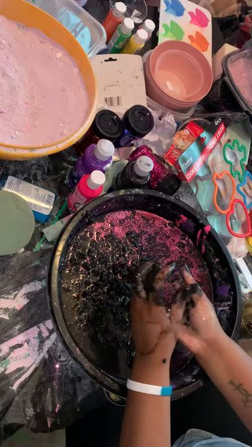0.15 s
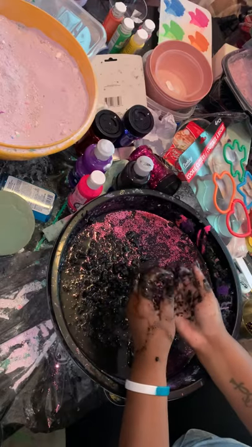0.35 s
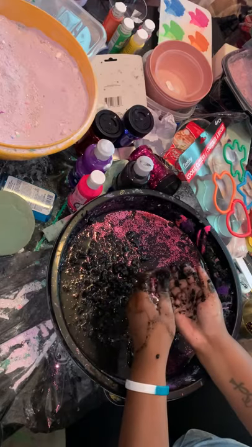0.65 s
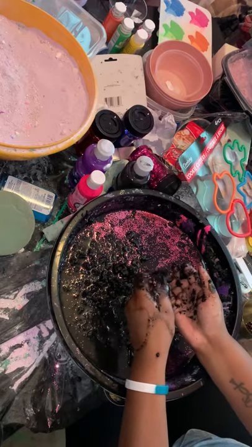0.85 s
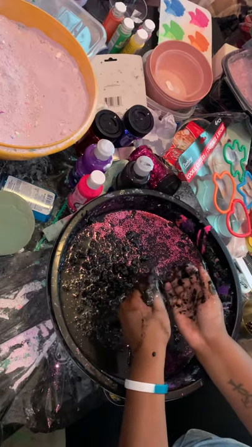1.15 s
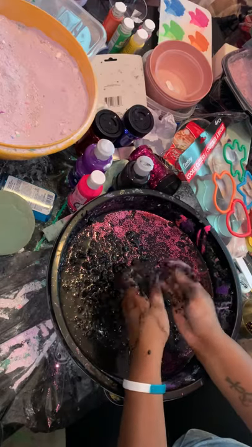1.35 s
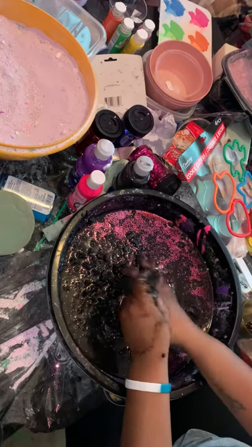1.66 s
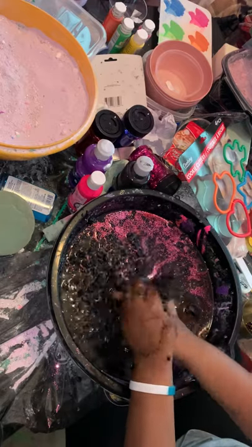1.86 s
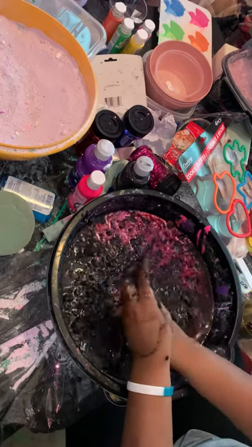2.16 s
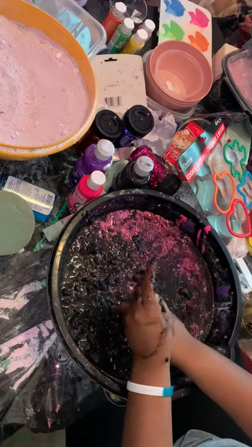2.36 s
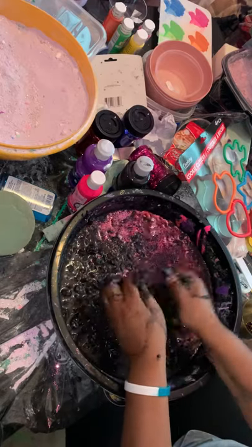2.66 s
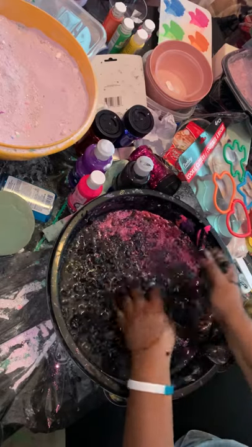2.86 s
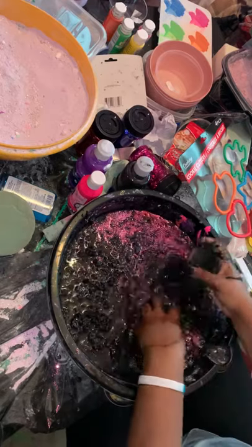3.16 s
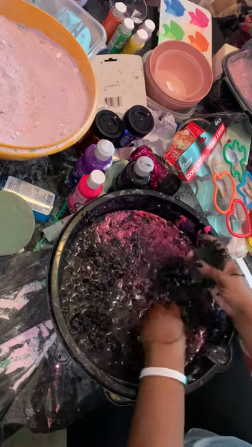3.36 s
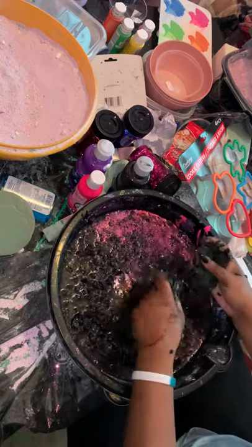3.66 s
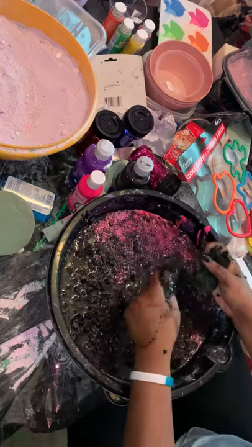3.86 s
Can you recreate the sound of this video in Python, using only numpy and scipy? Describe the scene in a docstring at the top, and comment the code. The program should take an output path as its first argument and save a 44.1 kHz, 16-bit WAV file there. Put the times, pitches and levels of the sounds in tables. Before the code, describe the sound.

Wet foam crumbs crunch, fizz and squish between kneading hands, then lumps plop into a tub

```python
"""Two hands squeeze and stir soaked floral foam in a plastic tub, close to a pair of microphones.
A low room rumble lies underneath and swells once, a little over a second in. From the start, crushed
cells fizz and crunch as showers of clicks and tiny rings; crumbs snap and wet foam pats in noise bursts.
Handfuls squelch in lumpy gurgles, bubbles burst as short rings and air pockets glide in pitch.
A small lump lands midway; near three seconds wet lumps slap down as falling plops, with a low thud."""
import sys
import numpy as np
from scipy import signal
from scipy.fft import rfft, irfft
from scipy.io import wavfile
from scipy.ndimage import uniform_filter1d

SR = 44100
rng = np.random.default_rng(int(sys.argv[2]) if len(sys.argv) > 2 else 0)


def dump(signal):
    """Clip the signal to [-1, 1] and save it as 16-bit WAV at the path in sys.argv[1]."""
    limited = np.clip(np.atleast_2d(signal).T, -1, 1)
    pcm = np.round(limited * 32767).astype(np.int16)
    wavfile.write(sys.argv[1], SR, pcm)


N = 176400
TIME, HZ = np.arange(N) / SR, np.fft.rfftfreq(2 * N, 1 / SR)


def amp(db):
    """Decibels to gain."""
    return 10 ** (np.asarray(db) / 20)


def unit(x):
    """Scales to rms 1."""
    return x / np.sqrt(np.mean(x ** 2) + 1e-20)


def read(points):
    """Reads a table over frequency, joined by straight lines on a log axis."""
    f, value = np.transpose(points)
    return np.interp(np.log(HZ + 1), np.log(f), value)


def colour(x, gain):
    """Filters by a gain for each frequency."""
    return irfft(rfft(x, 2 * N) * gain)[..., :N]


def add(mix, s, sound):
    """Mixes a sound in at a time in seconds."""
    part = mix[max(round(s * SR), 0):][:len(sound)]
    part += sound[:len(part)]


def clicks(per_s, spread_db):
    """Random clicks of either sign, mostly small and a few large."""
    size = amp(spread_db * np.minimum(rng.exponential(1, N), 4))
    sign = rng.choice([-1, 1], N)
    return size * sign * (rng.random(N) < per_s / SR)


def clumps(depth_db, size):
    """A gain that wanders at random, smoothed twice over a window of so many samples."""
    smooth = uniform_filter1d(uniform_filter1d(rng.standard_normal(N), size), size)
    return amp(depth_db * unit(smooth))


def thin(x):
    """Small bubbles radiate little bass: a steep cut below a corner."""
    cut_hz = 1010
    return colour(x, 1 / np.sqrt(1 + (cut_hz / (HZ + 1)) ** 10))


def rumble():
    """Low, wandering room noise, nearly the same at both microphones; it swells once."""
    # room rumble spectrum: (frequency [Hz], gain [dB])
    rumble_spectrum = [(20,-38),(35,-24.5),(54,4),(75,-1.5),(115,-6),(170,-18.5),(260,-28),(450,-40),(1500,-59.5),(15000,-93)]
    level_db, width_db = -60, -13  # width: noise that differs between the microphones
    swell_at_s, swell_length_s, swell_db = 1.14, 0.2, 5
    noise = rng.standard_normal(N) + amp(width_db) * rng.standard_normal((2, N))
    swell = amp(swell_db * np.exp(-((TIME - swell_at_s) / swell_length_s) ** 2))
    wandering = colour(noise, amp(read(rumble_spectrum))) * clumps(0.64, size=4000)
    return amp(level_db) * swell * unit(wandering)


def thud():
    """The weight of the lump bumps the tub's bottom and the table: low, fading tones."""
    # tones of the bump: (pitch [Hz], level [dB], fade time constant [s])
    thud_tones = [(106.7,-36,0.022),(76,-45.5,0.071)]
    start_s, rise_s = 3.084, 0.01
    t = np.maximum(TIME - start_s, 0)
    late = np.maximum(t - rise_s, 0)
    tones = sum(amp(db) * np.exp(-late / fade) * np.sin(2 * np.pi * hz * t)
                for hz, db, fade in thud_tones)
    return np.minimum(t / rise_s, 1) * tones


def pockets():
    """Clicks ring in an air pocket that swells and drains; its resonance glides in pitch."""
    # air pockets: (start [s], length [s], level before trim [dB], first pitch [Hz], last pitch [Hz])
    pocket_events = [(1.151,0.12,-64,2560,1700),(1.481,0.12,-60,2280,1550),(2.382,0.074,-70,1660,1500),(2.797,0.022,-54.5,2400,1530),(2.781,0.44,-60,780,870),(2.862,0.046,-53.5,1350,960),
                     (3.807,0.018,-50.5,4250,3300),(2.92,0.081,-53.5,780,930)]
    width_hz, trim_db = 320, -2.5
    out = np.zeros(N)
    r = np.exp(-np.pi * width_hz / SR)
    for s, length, db, first_hz, last_hz in pocket_events:
        u = np.arange(0, length, 1 / SR) / length
        pitch = first_hz + (last_hz - first_hz) * u
        turn = np.exp(2j * np.pi * np.cumsum(pitch) / SR)
        # shift the gliding pitch to zero, resonate there, shift back
        still = clicks(900, 0.51)[:len(u)] / turn
        ring = (turn * signal.lfilter([1], [1, -2 * r, r * r], still)).real
        add(out, s, amp(db + trim_db) * np.sqrt(np.sin(np.pi * u)) * unit(ring))
    return out


def squelches():
    """Water and air are forced out of a handful in low, lumpy gurgles of clicks."""
    # handfuls squeezed against the tub: (start [s], rise [s], hold [s], release time constant [s],
    # level [dB], brightness [dB per octave])
    squelch_events = [(0.42,0.072,0.13,0.035,-60.5,-12.5),(0.8,0.0058,0.047,0.022,-53,-11.5),(0.871,0.0032,0.016,0.046,-51.5,-10),(0.981,0.034,0.042,0.021,-62,-7),
                      (1.841,0.043,0.022,0.028,-54.5,-7),(2.105,0.11,0.41,0.25,-66.5,9.5),(2.954,0.057,0.0055,0.0099,-46,-18),(3.049,0.012,0.04,0.022,-45,-7.5)]
    # gurgle spectrum: (frequency [Hz], gain [dB])
    squelch_spectrum = [(25,-40),(70,4.5),(160,-6.5),(280,-4.5),(410,5),(510,3.5),(740,2.5),(1000,0),(1400,-6),(1800,-20),(2600,-53),(6000,-57)]
    tilt_from_hz = 263  # each squelch brightens or dulls above this
    out = np.zeros(N)
    octaves_up = np.log2(np.maximum(HZ / tilt_from_hz, 1))
    for s, rise, hold, release, db, tilt_db in squelch_events:
        gurgle = colour(clicks(1300, 3.65), amp(read(squelch_spectrum) + tilt_db * octaves_up))
        fade = np.exp(-np.maximum(TIME - s - rise - hold, 0) / release)
        shape = np.clip((TIME - s) / rise, 0, 1) * fade
        out += amp(db) * shape * unit(gurgle)
    return out * clumps(2.8, size=350)


def slaps():
    """A wet lump lands: a fast falling plop with a noise splash around it."""
    # landing lumps: (time [s], envelope peak [dB], starting pitch [Hz], time to the peak [s])
    slap_events = [(1.9115,-38.5,1300,0.0038),(2.9755,-27,1750,0.0027),(3.0040,-27.5,1050,0.0034),(3.0675,-29.5,1574,0.0028),(3.0985,-40,800,0.003)]
    # splash spectrum: (frequency [Hz], gain [dB])
    splash_spectrum = [(100,-37.5),(400,1.5),(750,-9.5),(1000,-33),(1350,-2.5),(1750,-13),(2100,-16.5),(2700,-27),(5000,-28),(9000,-45)]
    end_hz, glide_lengths, splash_db = 344, 1.443, -5.5  # splash relative to the envelope
    out, t = np.zeros(N), TIME[:3000]
    splash = amp(splash_db) * unit(colour(rng.standard_normal(N), amp(read(splash_spectrum))))
    for k, (s, db, hz, length) in enumerate(slap_events):
        pitch = end_hz + (hz - end_hz) * np.exp(-t / (glide_lengths * length))
        plop = np.sin(2 * np.pi * np.cumsum(pitch) / SR)
        shape = t / length * np.exp(1 - t / length)
        add(out, s, amp(db) * shape * (plop + splash[k * len(t):][:len(t)]))
    return out


def tub(x):
    """The plastic tub rings in its modes with whatever presses on it."""
    # modes of the tub: (pitch [Hz], level [dB], time to fall 60 dB [s])
    tub_modes = [(267,-2,0.16),(408.3,10,0.13),(684,7,0.16),(746.5,13.5,.18),(895,4,.15),(1204,12,.15)]
    level_db = -12  # relative to what presses on it
    t = TIME[:SR // 2]
    ring = sum(amp(db) * 1000 ** (-t / t60) * np.cos(2 * np.pi * hz * t) for hz, db, t60 in tub_modes)
    return amp(level_db) * np.std(x) * unit(signal.fftconvolve(x, ring)[:N])


def pats():
    """Wet foam meets or leaves the skin with a short, broad smack of noise."""
    # pats against the hands: (time [s], level before the envelope [dB], centre [Hz])
    pat_events = [(0.3142,-50,1410),(0.3878,-49,1500),(.4262,-49.5,1180),(.5035,-48.5,890),(0.578,-45.5,890),(.8055,-44.5,1130),(0.825,-42,1580),(.8800,-44.5,1010),(.9415,-48,1400),
                  (1.0386,-44.5,590),(1.0830,-55,1500),(1.1565,-48.5,1800),(1.2186,-48,1360),(1.775,-49.5,1390),(1.9105,-51.5,1010),(2.1590,-56.5,1700),(2.3365,-54,1900),(3.0057,-40,1680),(3.1645,-45.5,1006),(3.947,-56,1600)]
    rise_s, fade_s, width_octaves = 0.00052, 0.0044, 1.05
    out, t = np.zeros(N), TIME[:1024]
    hz = np.fft.rfftfreq(len(t), 1 / SR) + 1
    shape = np.minimum(t / rise_s, 1) * np.exp(-np.maximum(t - rise_s, 0) / fade_s)
    for s, db, centre_hz in pat_events:
        band = np.exp(-(np.log2(hz / centre_hz) / width_octaves) ** 2)
        smack = unit(irfft(rfft(rng.standard_normal(len(t))) * band))
        add(out, s, amp(db) * shape * smack)
    return out


def pops():
    """A larger bursting bubble rings briefly at its own pitch."""
    # bursting bubbles: (time [s], envelope peak before the bass cut [dB], pitch [Hz])
    pop_events = [(0.941,-39,1550),(0.9745,-41,1620),(0.9755,-51,2370),(1.1777,-51,2660),(1.2200,-43,2200),(1.2470,-50,860),(1.336,-53,1290),(1.348,-52,1900),
                  (1.5745,-44,1930),(1.7754,-54.5,1249),(2.437,-38.5,1440),(2.796,-39,2240),(2.8760,-38,1780),(3.1840,-38,910),(3.198,-48,1170),
                  (3.7489,-42,2400),(3.8041,-38.5,1370),(3.9041,-41,1630),(3.9044,-36,3340),(3.9166,-37,3350),(3.9840,-44,1550)]
    fade_cycles, rise_s = 2.2, 0.00067
    out, t = np.zeros(N), TIME[:1200]
    for s, db, hz in pop_events:
        shape = (1 - np.exp(-t / rise_s)) * np.exp(-t * hz / fade_cycles)
        add(out, s, amp(db) * shape / shape.max() * np.sin(2 * np.pi * hz * t))
    return thin(out)


def snaps():
    """A crumb breaks in a noise burst of a few milliseconds, with a faint lower body."""
    # snapping crumbs: (time [s], level before the envelope [dB], centre [Hz], spread [octaves])
    snap_events = [(0.1693,-45,11600,0.53),(0.316,-39.5,8850,1.6),(0.319,-54,8000,1.1),(.3882,-42,7700,1.1),(0.3915,-44.5,8400,0.96),(.5790,-48,5270,0.79),
                   (0.7668,-50,6550,1.9),(0.8353,-41,7600,0.13),(.8570,-47.5,6400,0.12),(1.0054,-40.5,11500,0.99),(1.1253,-44,7100,0.49),(1.1637,-44.5,12000,0.39),
                   (1.6665,-43,6640,0.33),(1.7380,-48,6600,0.15),(1.7540,-46.5,12900,0.54),(1.7719,-38,6650,0.15),(2.158,-44,7400,1.6),
                   (2.3377,-33.5,11700,0.8),(2.4380,-46.5,5850,0.27),(2.4595,-48.5,9000,1.2),(2.474,-45,8850,1.2),(2.632,-43,7300,0.31),(2.638,-46,8500,0.18),(2.6490,-44,8300,0.19),
                   (2.695,-45.5,4060,0.65),(2.762,-54,6500,0.11),(2.7835,-48,6160,0.078),(2.7978,-40.5,4630,1),(2.871,-45,7100,0.17),(2.8747,-38.5,6800,0.79),(3.0830,-49.5,6460,0.15),
                   (3.8026,-41.5,12000,0.68),(3.8050,-44,4660,0.54),(3.9040,-39,4970,0.64),(3.9325,-45.5,5800,0.34),(3.95,-47,7000,0.76),(3.9584,-39.5,8250,0.77),(3.9728,-41,5600,0.072)]
    hold_s, fade_s, body_hz, body_db = 0.0017, 0.0009, 2400, -20
    out, t = np.zeros(N), TIME[:512]
    hz = np.fft.rfftfreq(len(t), 1 / SR) + 1
    shape = np.exp(-np.maximum(t - hold_s, 0) / fade_s)
    body = amp(body_db) * np.exp(-np.log2(hz / body_hz) ** 2)
    for s, db, centre_hz, octaves in snap_events:
        band = 1 / (1 + (np.log2(hz / centre_hz) / octaves) ** 2) + body
        burst = unit(irfft(rfft(rng.standard_normal(len(t))) * band))
        add(out, s, amp(db) * shape * burst)
    return out


def fits():
    """The foam gives way in fits: each starts at once and dies quickly."""
    per_s, depth, fade_s = 60, 0.95, 0.0045
    gives = (rng.random(N) < per_s / SR) * rng.uniform(0.47, 1.3, N)
    bursts = signal.oaconvolve(gives, np.exp(-TIME[:4000] / fade_s))[:N]
    return unit(1 + depth * bursts)


def grains(per_s, spread_db, centre_hz, octaves, cycles):
    """Many tiny cavities, each ringing for a few cycles at one of forty pitches."""
    train, t = clicks(per_s, spread_db), TIME[:900]
    kind, out = rng.integers(0, 40, N), np.zeros(N)
    # evenly ranked picks from a bell curve of pitches
    for k, octave in enumerate(np.sort(rng.standard_normal(4000))[50::100]):
        hz = centre_hz * 2 ** (octave * octaves)
        ring = np.sin(2 * np.pi * hz * t) * np.exp(-t * hz / cycles) * (1 - np.exp(-t * hz))
        out += signal.oaconvolve(train * (kind == k), ring)[:N]
    return out


def kneading():
    """Bubbles and collapsing cells ring briefly over a fizz of fine clicks."""
    # the kneading, before trims: (time [s], bubbling level [dB], crunch level [dB], fizz level [dB])
    knead_levels = [(0, -66, -71, -62.5), (0.118, -86.5, -91, -69.5), (0.298, -57.5, -58.5, -53.5),
                    (0.37, -72, -69, -58.5), (0.471, -57, -64, -56), (0.6, -58, -57, -63),
                    (0.73, -68, -65.5, -68), (0.78, -60.5, -61, -57.5), (0.83, -54, -47, -52.5),
                    (0.95, -48.5, -54.5, -58.5), (1.07, -53.5, -50, -59), (1.14, -60, -63, -62),
                    (1.2, -74, -66.5, -63.5), (1.42, -76, -75.5, -63.5), (1.531, -70, -59.5, -58),
                    (1.72, -61, -74.5, -62.5), (1.8, -58, -59, -59), (2.05, -67, -78.5, -67.5),
                    (2.25, -64, -60, -54.5), (2.32, -62, -70, -64.5), (2.42, -56, -64.5, -65.5),
                    (2.581, -54, -60, -63), (2.65, -61, -63, -53), (2.75, -80, -63.5, -62),
                    (2.87, -70, -61.5, -57), (3.05, -57.5, -66.5, -61), (3.3, -71.5, -89.5, -70),
                    (3.5, -72, -77, -71), (3.66, -67.5, -73, -73), (3.79, -64, -66, -64),
                    (3.815, -69, -57, -58), (3.89, -61, -64, -59.5), (3.93, -68, -55.5, -59),
                    (4, -62, -64, -55.5)]
    # colour of the crushed cells: (frequency [Hz], gain [dB])
    crunch_spectrum = [(900,4),(1900,-5),(2700,-5),(3600,-1),(4400,-0.5),(5300,-4),(7500,-1),(10000,-14)]
    # colour of the fine clicks: (frequency [Hz], gain [dB])
    fizz_spectrum = [(3000,-13),(5000,-4.5),(5900,-2.5),(6800,-1),(8300,-3.5),(9800,-7),(12600,-1),(14000,-4.5),(16000,-22)]
    bubble_db, crunch_db, fizz_db = -7, -0.5, -0.26  # trims
    s, *levels = np.transpose(knead_levels)
    wet, crunch, fizz = (amp(np.interp(TIME, s, level)) for level in levels)
    bubbles = grains(per_s=1700, spread_db=2.96, centre_hz=1550, octaves=0.582, cycles=2.3)
    cells = grains(per_s=2200, spread_db=3.9, centre_hz=4112, octaves=0.585, cycles=4.7)
    bubbling = wet * amp(bubble_db) * unit(thin(bubbles))
    crunching = crunch * amp(crunch_db) * unit(colour(cells, amp(read(crunch_spectrum))))
    fizzing = fizz * amp(fizz_db) * unit(colour(clicks(6000, 1.53), amp(read(fizz_spectrum))))
    return fits() * (bubbling + crunching + fizzing)


def echoes(x, t60, spectrum, shift_s):
    """A dying cloud of reflections, different at each microphone and from moment to moment."""
    out, hop, t = np.zeros((2, N)), round(shift_s * SR), TIME[:round(2 * shift_s * SR)]
    for start in range(-hop, N, hop):
        # overlapping pieces, each with fresh reflections
        at = np.arange(max(start, 0), min(start + 2 * hop, N))
        piece = x[at] * np.sin(np.pi * (at - start) / (2 * hop))
        for channel in out:
            tail = rng.standard_normal(len(t)) * np.exp(-np.log(1000) * t / t60)
            add(channel, at[0] / SR, signal.fftconvolve(piece, tail / np.linalg.norm(tail)))
    return colour(out, amp(read(spectrum)))


def scene():
    """The foam reaches the two microphones directly, off tub and hands, and off the room."""
    # phase between the microphones: (frequency [Hz], lead of the left [radians])
    pair_phase = [(200,0),(900,-.3),(1500,0),(2300,.4),(3500,.7),(4300,1.8),(4900,3.14),(5700,4.9),(6400,6.15),(7600,6.35),(8500,7.9),(9700,9.42),(10700,10.9),(11700,12.3),(12800,12.7),(13600,14.6),(14600,15.7)]
    # level between the microphones: (frequency [Hz], left minus right [dB])
    pair_balance = [(60,-1.9),(400,-2.6),(1200,-0.3),(2500,-2.5),(4500,0.4),(14000,-0.6)]
    # reflections off tub and hands: (frequency [Hz], level relative to the direct sound [dB])
    scatter_spectrum = [(100,-20),(700,-10),(1500,-9),(3000,0),(4500,-4),(6800,-14),(8500,-8),(12500,-12)]
    # reflections off the room: (frequency [Hz], level relative to the direct sound [dB])
    room_spectrum = [(100,-9),(700,-2.5),(3000,0),(7000,-8),(14000,-58)]
    hollow_hz, hollow_width_hz, hollow_db = 505, 42, -7  # a narrow dip in the sound of the tub
    heavy = slaps() + squelches()
    foam = kneading() + snaps() + pops() + pats() + pockets() + heavy + tub(heavy) + thud()
    foam = colour(foam, amp(hollow_db * np.exp(-((HZ - hollow_hz) / hollow_width_hz) ** 2)))
    side = np.array([[.5], [-.5]])  # half of each difference to left and right
    heard = colour(foam, np.exp(1j * side * read(pair_phase)))
    # the moving hands keep changing the reflections
    heard += echoes(foam, t60=.02, spectrum=scatter_spectrum, shift_s=.04)
    heard += echoes(foam, t60=0.34, spectrum=room_spectrum, shift_s=.2)
    # keep the foam's overall spectrum with the reflections added
    power = 1 + amp(read(scatter_spectrum)) ** 2 + amp(read(room_spectrum)) ** 2
    heard = colour(heard, 1 / np.sqrt(power))
    return colour(heard + rumble(), amp(side * read(pair_balance)))


def record(dry):
    """The recorder's band limit: a steep low-pass."""
    edge_hz = 16200
    lowpass = signal.firwin(511, edge_hz, window=("kaiser", 9), fs=SR)
    return signal.oaconvolve(dry, lowpass[None], "same")


dry = scene()
out = record(dry)
dump(out)
```